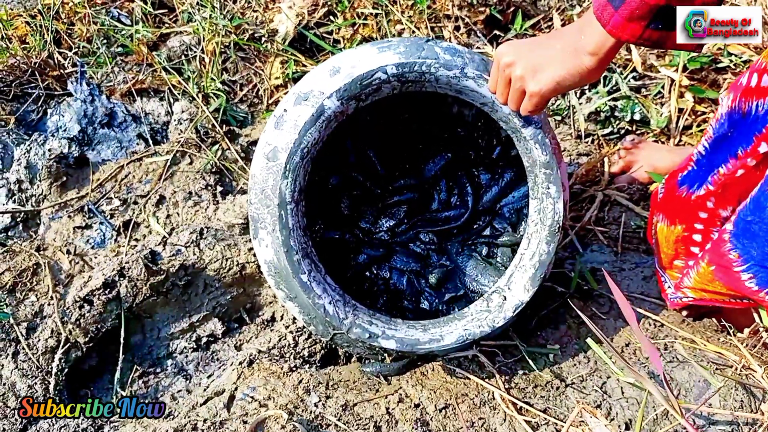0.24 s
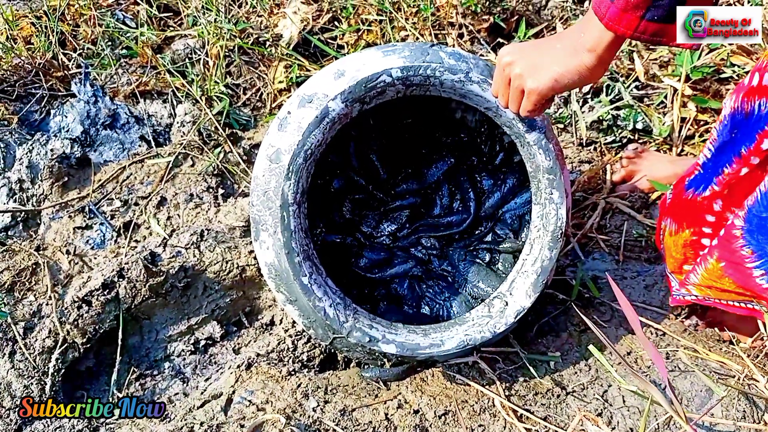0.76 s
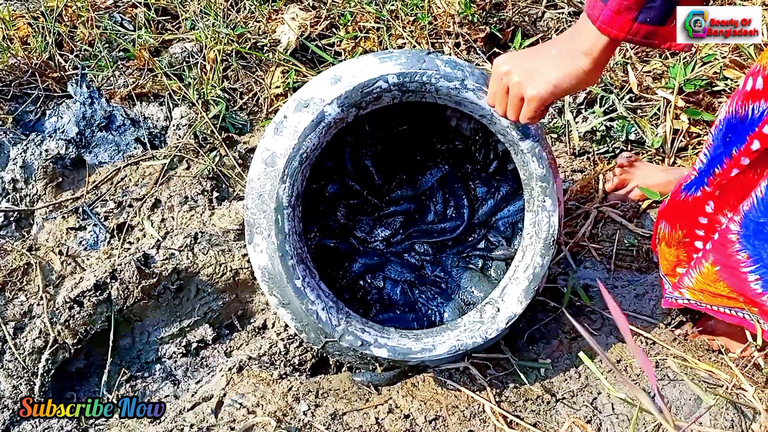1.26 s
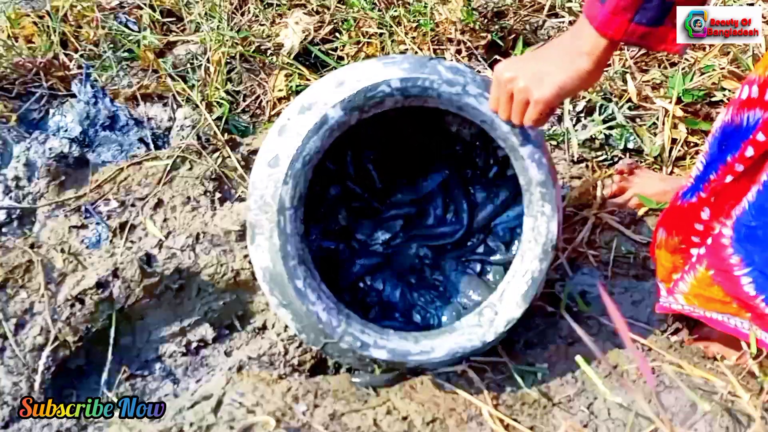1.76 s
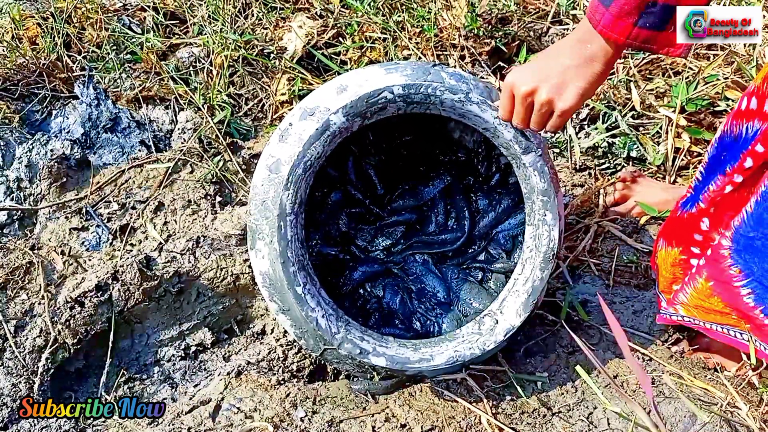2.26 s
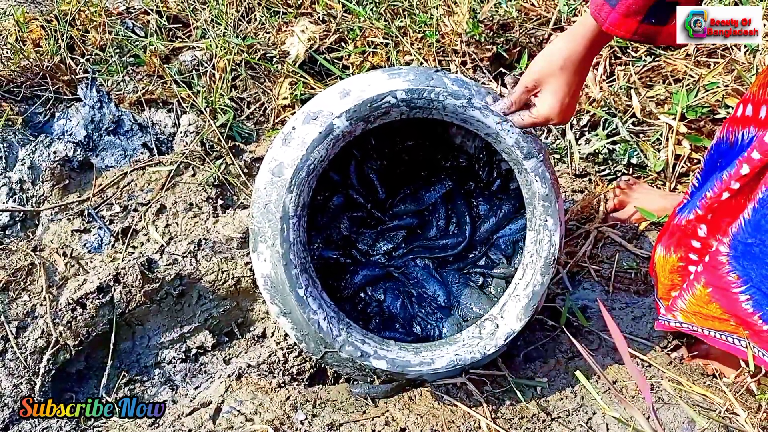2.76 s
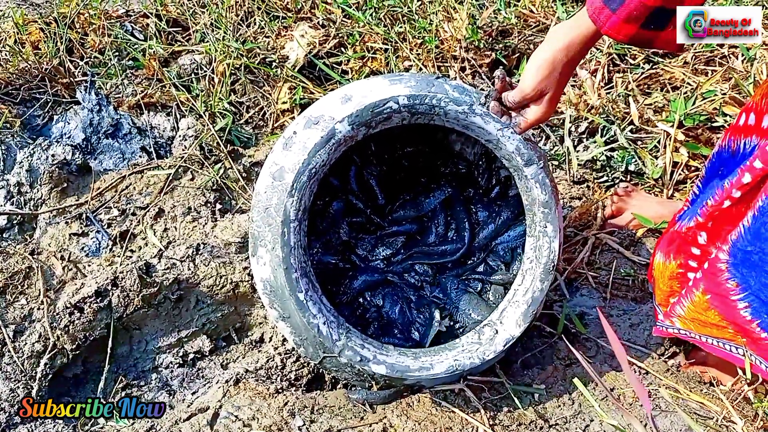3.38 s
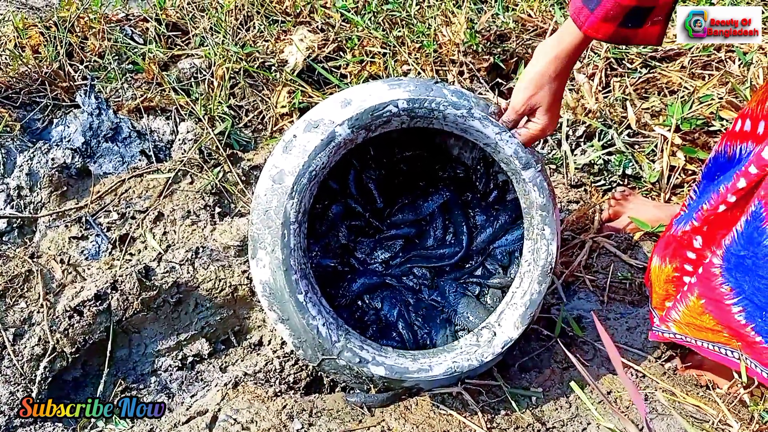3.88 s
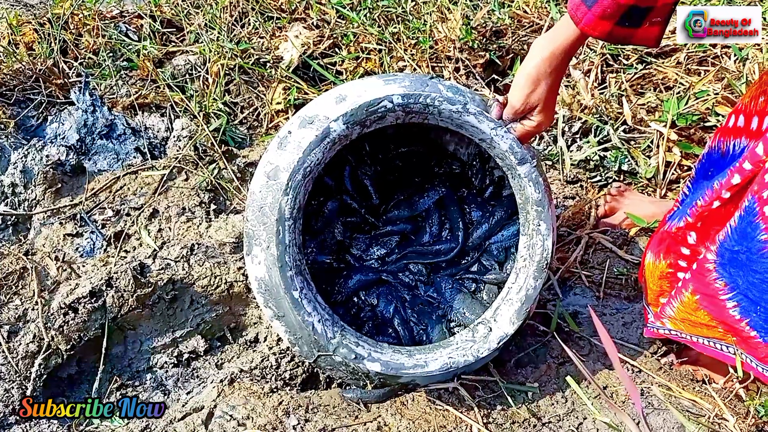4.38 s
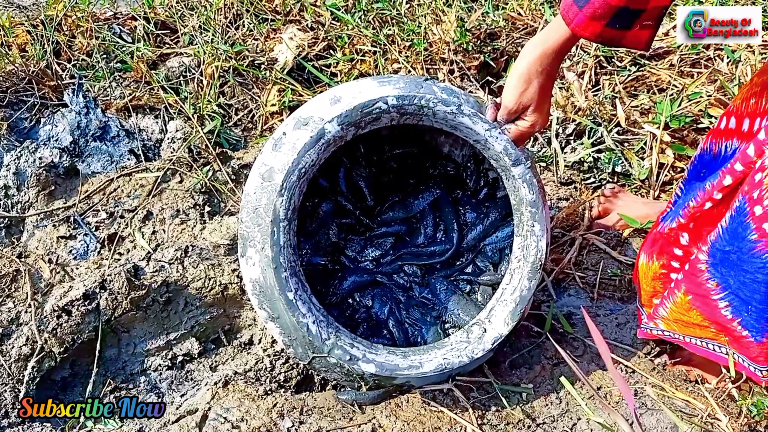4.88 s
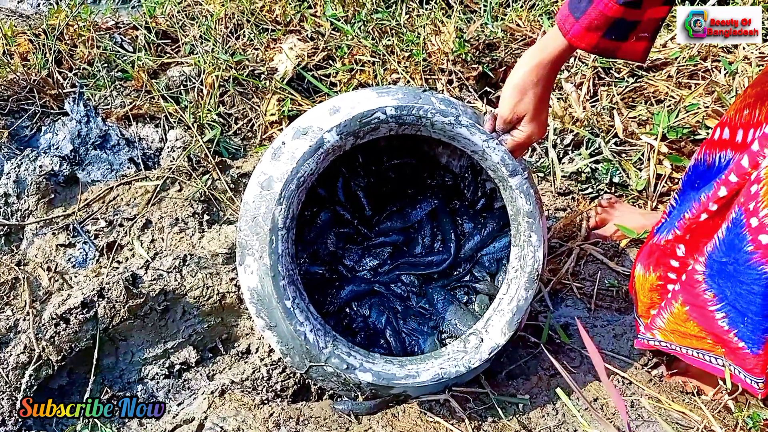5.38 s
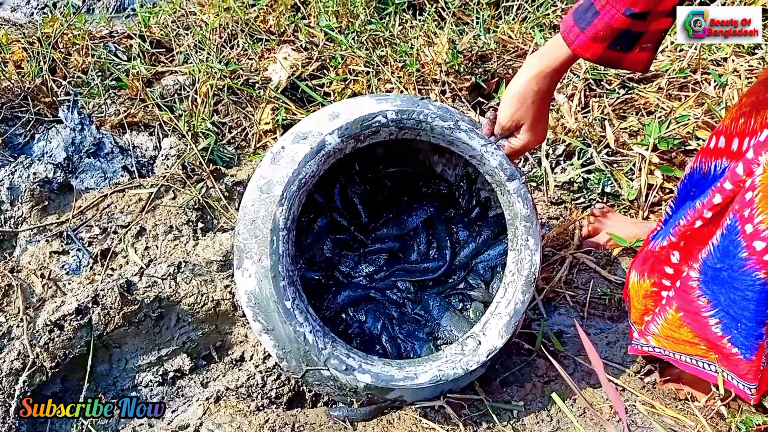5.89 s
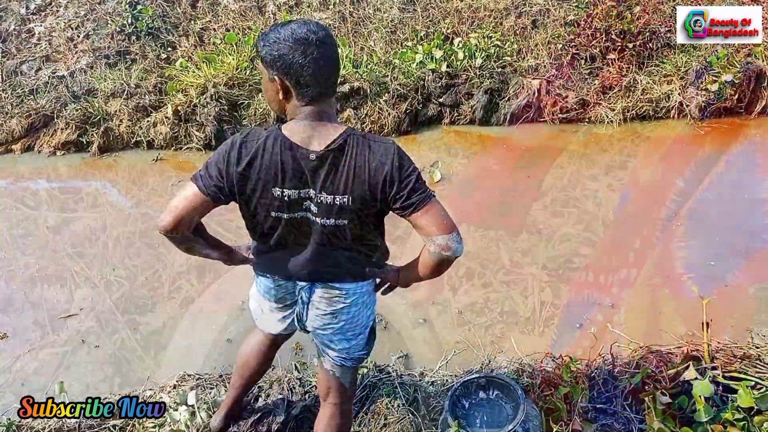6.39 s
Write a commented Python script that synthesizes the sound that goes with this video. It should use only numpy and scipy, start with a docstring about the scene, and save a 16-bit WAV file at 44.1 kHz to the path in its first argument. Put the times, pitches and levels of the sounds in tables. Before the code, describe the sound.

A slow single-cylinder diesel pump chugs steadily outdoors, growing louder over rushing water, after early wet splashes and tiny bubble plinks nearby.

```python
"""A slow single-cylinder diesel pump chugs outdoors, nearly eleven firings a second, while water rushes on the right.
In the first second or so fish splash and bubbles plink close by: short noise bursts and brief sine tones.
The speed creeps up twice, and each time the governor cuts the fuel (1.6 s, 4.2 s): the beat drops, then recovers.
Each cycle is an exhaust thump and a hollow intake knock, made of filtered pulses over gas noise and gear whine.
Runs of hissing chuffs come at about 3 s and after 5 s; the sound grows overall, then fades with faint sagging tones."""
import sys
import numpy as np
from scipy import signal
from scipy.fft import rfft, irfft, next_fast_len
from scipy.io import wavfile
from scipy.ndimage import uniform_filter1d, map_coordinates

SR = 44100
rng = np.random.default_rng(int(sys.argv[2]) if len(sys.argv) > 2 else 0)


def digitize_waveform(pressure):
    """Quantize a signal to 16-bit integers and store it at the path in sys.argv[1].

    Rows of a 2-D input are taken as channels; values are limited to [-1, 1].
    """
    field = np.atleast_2d(pressure).T
    bounded = np.clip(field, -1, 1)
    quanta = np.round(bounded * 32767).astype(np.int16)
    wavfile.write(sys.argv[1], SR, quanta)


N = 292956
TIME = np.arange(N) / SR  # seconds

# Engine speed. Each row: time in seconds, firings per second.
ENGINE_SPEED = [(0, 10.591), (1.484, 11.18), (1.815, 10.474), (2.164, 10.329), (3.682, 10.771),
                (4.182, 11.056), (4.547, 10.61), (5.735, 10.512), (6.64, 10.935)]
# Colour of the low gas noise and of the scattered echo. Each row: frequency in Hz, relative level in dB.
RUMBLE_COLOUR = [(25, -38), (42, -26), (65, -4), (110, -2.5), (170, 4), (240, 5.5), (330, 2), (450, -21),
                 (700, -12.5), (1000, -79)]
KNOCK_CUT_SHARE = 0.64  # part of the thump's drop in dB that the knock and the gulp share


def amp(db):
    """Turn decibels into a gain."""
    return 10 ** (np.asarray(db) / 20)


def unit(x):
    """Scale to an rms (average strength) of 1."""
    return x / np.sqrt(np.mean(x ** 2) + 1e-20)


def along(points, hz):
    """Read a curve of (Hz, value) points, joined by straight lines on a log frequency axis."""
    f, v = np.transpose(points)
    return np.interp(np.log(hz + 1), np.log(f + 1), v)


def curves(rows, when=TIME):
    """Read each column after the time at the given moments."""
    s, *cols = np.transpose(rows)
    return [np.interp(when, s, c) for c in cols]


def wobble(rate):
    """A smooth random curve of rms 1 through `rate` random points a second."""
    knots = rng.standard_normal(int(N * rate / SR) + 4)
    return unit(map_coordinates(knots, [TIME * rate]))


def filtered(x, response):
    """Multiply the spectrum of x by a response, which is a function of frequency."""
    m = next_fast_len(N + SR // 2)
    return irfft(rfft(x, m) * response(np.fft.rfftfreq(m, 1 / SR)), m)[..., :N]


def delay(hz, s):
    """Response of a pure delay of s seconds."""
    return np.exp(-2j * np.pi * hz * s)


def resonance(hz, centre, width):
    """Response of one damped resonance; a wider one dies sooner."""
    return 1j * hz * width / (centre ** 2 - hz ** 2 + 1j * hz * width)


def placed(x, lead_s, right_db):
    """Place a sound in stereo: the left side hears it lead_s earlier, the right side right_db louder."""
    def sides(hz):
        left = delay(hz, -lead_s / 2) * amp(-right_db / 2)
        right = delay(hz, lead_s / 2) * amp(right_db / 2)
        return np.array([left, right])
    return filtered(x, sides)


def rush(spectrum, grain_db, rings=()):
    """Stereo noise of rms 1, broken into millisecond grains and coloured by a spectrum and resonances."""
    # Each row: frequency in Hz, likeness of left and right (1 means the same).
    likeness = [(200, 0.98), (500, 0.89), (1000, 0.4), (2000, 0.41), (4000, 0.71), (8000, 0.079)]
    pair = rng.standard_normal((2, N)) * amp(grain_db * wobble(900))

    def colour(hz):
        boost_db = sum(db * np.abs(resonance(hz, centre, width)) ** 2 for centre, width, db in rings)
        return amp(along(spectrum, hz) + boost_db)

    def mix(hz):
        # the angle shares the noise out between the middle and the sides
        turn = np.arccos(np.clip(along(likeness, hz), -1, 1)) / 2
        return colour(hz) * [np.cos(turn), np.sin(turn)]

    mid, side = filtered(pair, mix)
    return unit(np.array([mid + side, mid - side]))


def patchy(x, depth_db, size=256):
    """From moment to moment noise favours other pitches; a longer window gives narrower, slower patches."""
    z = signal.stft(x, nperseg=size)[2]
    patches = uniform_filter1d(rng.standard_normal(z.shape[1:]), size=2, axis=0)
    patches = uniform_filter1d(patches, size=4, axis=1)
    return unit(signal.istft(z * amp(depth_db * unit(patches)), nperseg=size)[1][:, :N])


def ringing(x, centre_hz, width_hz, share):
    """Add the ring of one cavity that x excites."""
    return x + share * signal.lfilter(*signal.iirpeak(centre_hz, centre_hz / width_hz, SR), x)


def pulses(times, db, response, ring_s=1):
    """One pressure pulse of the given peak level at each time, coloured by a response, damped after ring_s."""
    train = np.bincount(np.round(times * SR).astype(int), amp(db), N)[:N]
    shape = irfft(response(np.fft.rfftfreq(SR, 1 / SR)))
    shape = shape / (1 + (np.fft.fftfreq(SR) / ring_s) ** 4)  # here fftfreq gives seconds from the pulse
    return signal.fftconvolve(train, np.fft.fftshift(shape))[SR // 2:][:N] / np.abs(shape).max()


def crank():
    """Add up the speed into cycles: gives firing times, and at each sample the seconds since a firing."""
    rate, = curves(ENGINE_SPEED)
    cycles = np.cumsum(rate) / SR - rate[0] * .0522  # the first firing comes at 0.0522 s
    fired = np.interp(np.arange(int(cycles[-1]) + 1), cycles, TIME)
    return fired, cycles % 1 / rate


def fuel_cut_db(when):
    """How far the governor holds the beat down: a sudden cut and a gradual return."""
    # Each row: moment of the cut in seconds, drop of the thump in dB.
    cuts = [(1.584, 7.5), (4.22, 3.5)]
    recover_s = 0.15
    return sum(db * (when >= s) * np.exp(-np.abs(when - s) / recover_s) for s, db in cuts)


def thump_db(when):
    """Strength of the beat at the given moments: its slow course less the fuel cuts."""
    # Each row: time in seconds, beat level in dB before the fuel cuts and the exhaust's own gain.
    loudness = [(0, -26), (.8, -22.5), (2.3, -24.5), (2.8, -19.5), (3.9, -14), (5.1, -11), (5.9, -9),
                (6.38, -11.5), (6.64, -22)]
    return curves(loudness, when)[0] - fuel_cut_db(when)


def following(law):
    """Level in dB of a layer that grows with the beat's strength and with speed."""
    usual_thump_db, usual_rate = -20, 10.6  # rate in firings per second
    usual_db, per_db, per_rate = law
    stronger_db = thump_db(TIME) - usual_thump_db
    faster = curves(ENGINE_SPEED)[0] - usual_rate
    return usual_db + per_db * stronger_db + per_rate * faster


def tones():
    """Faint sine tones near the end swell, sag in pitch and fade."""
    # Each row: middle in seconds, half length in seconds, pitch in Hz, glide in Hz per second, level in dB.
    sags = [(6.188, 0.17, 857, -120, -40.5), (6.219, 0.087, 655, -200, -38), (6.54, 0.045, 990, -200, -45)]
    glides = np.zeros(N)
    for s, half_s, hz, glide, db in sags:
        swell = np.exp(-((TIME - s) / half_s) ** 2)
        phase = 2 * np.pi * np.cumsum(hz + glide * (TIME - s)) / SR
        glides += amp(db) * swell * np.sin(phase)
    return placed(glides, lead_s=.0002, right_db=1)


def gears(age, swing=0.33):
    """A gear of 53 teeth turns once per cycle; firings kick it, and its whine wavers in uneven spurts."""
    # Each row: time in seconds, whine level in dB.
    whine_level = [(0, -56), (.5, -50.5), (1.4, -47), (1.9, -53), (3, -49.5), (5.2, -43), (5.9, -36),
                   (6.2, -40), (6.64, -49)]
    rate, = curves(ENGINE_SPEED)
    mesh = 2 * np.pi * 53 * np.cumsum(rate) / SR
    kick = np.sin(2 * np.pi * age * rate)
    load_db = 1.5 * kick + 8 * np.tanh(wobble(19))
    waver = 1.1 * wobble(14) + .35 * wobble(60)  # radians
    tooth_tone = np.sin(mesh + swing * kick + waver)
    whine = amp(curves(whine_level)[0]) * unit(amp(load_db) * tooth_tone)
    return placed(whine, lead_s=.0002, right_db=1)


def water(age, throb_db=0.78, flutter_db=1.0):
    """The pumped water gurgles, rushes in fine spatter and throbs a little with the strokes."""
    # Colours of the spatter and the gurgle. Each row: frequency in Hz, relative level in dB.
    spatter_colour = [(600, -59), (930, -30.5), (1150, -14), (1400, -17), (1800, -9), (2300, -8),
                      (3100, -1), (3800, -10.5), (4700, -13), (5400, -17), (6200, -15.5), (7000, -17),
                      (8600, -40.5), (13000, -55), (15500, -48.5)]
    gurgle_colour = [(450, -27.5), (700, -2), (830, 3), (960, -2.5), (1150, -1), (1450, -7), (2000, -3),
                     (4500, -23.5), (7000, -43), (9000, -63)]
    # Ringing of the outlet pipe. Each row: pitch in Hz, width in Hz, boost in dB.
    outlet_rings = [(2360, 510, 6), (3065, 107, 3), (6595, 220, 6)]
    # Courses of the two levels. Each row: time in seconds, level in dB before the offset added below.
    spatter_course = [(0.0, -42.5), (0.63, -41), (0.85, -37.5), (1.5, -40.5), (3.33, -36), (4.22, -31),
                      (5.75, -28.5), (6.64, -49.5)]
    gurgle_course = [(0.0, -67.5), (3.14, -51.5), (5.66, -37), (6.25, -40), (6.64, -52)]
    gurgle_db = 4.5 + curves(gurgle_course)[0]
    spatter_db = -1.5 + curves(spatter_course)[0]
    throb = np.cos(2 * np.pi * (age - .018) * curves(ENGINE_SPEED)[0])  # strongest 18 ms after a firing

    gurgle = patchy(rush(gurgle_colour, grain_db=2.0), depth_db=3.5)
    gurgle = amp(gurgle_db + 1.47 * throb) * gurgle

    # slow, narrow patches first, then quick, broad ones
    stream = patchy(rush(spatter_colour, grain_db=0.5, rings=outlet_rings), depth_db=2.2, size=2048)
    flicker_db = throb_db * throb + flutter_db * wobble(45)
    spatter = amp(spatter_db + flicker_db) * patchy(stream, depth_db=2.5)
    return placed(gurgle, lead_s=0.00035, right_db=5.5) + placed(spatter, lead_s=0.000435, right_db=12.0)


def chuffs(spit_db=-8):
    """Bursts of hiss, in runs a little slower than the firing, swell to a sharp spit with a hoarse ring."""
    # Each row: middle in seconds, level in dB, half length in seconds, ring in Hz, strength of the ring.
    puffs = [(2.678, -38, 0.0065, 2420, 2.2), (2.777, -41.5, 0.0021, 2080, 1.1),
             (2.87, -43, 0.0039, 5840, 0.57), (2.973, -40.5, 0.0056, 2330, .8),
             (3.062, -40.5, 0.0055, 3100, 1.4), (3.264, -39, 0.0044, 5600, 0.76),
             (5.04, -28, 0.011, 6700, 0.4), (5.396, -33, 0.0049, 6600, 0.63),
             (5.493, -29.5, 0.0037, 6650, 0.67), (5.59, -32, 0.0033, 7000, 0.57),
             (5.686, -23.5, 0.0045, 6600, 0.33), (5.786, -24, 0.0058, 3060, 1.2),
             (5.881, -23.5, 0.0065, 4440, 0.32), (5.979, -24.5, 0.008, 3790, 0.67),
             (6.071, -28.5, 0.013, 3500, 0.68), (6.169, -25.5, 0.0079, 2530, 0.77),
             (6.264, -29, 0.0067, 2455, 1.8), (6.361, -35, 0.011, 6760, 0.81),
             (6.455, -34.5, 0.014, 2750, 0.48), (6.549, -41.5, 0.01, 3460, 1.7)]
    # Each row: frequency in Hz, relative level in dB.
    hiss_colour = [(600, -28), (1700, -10), (2600, 3.5), (3700, -7), (5000, -10.5), (5900, -13),
                   (6900, -11), (7800, -24), (9000, -52), (15000, -48)]
    hiss = patchy(rush(hiss_colour, grain_db=1.5), depth_db=4)
    hoarse = 1.2 * wobble(700)  # radians of random phase
    bursts = np.zeros((2, N))
    for s, db, half_s, hz, share in puffs:
        near = np.abs(TIME - s) < .05
        t = TIME[near] - s
        ring = np.sin(2 * np.pi * hz * TIME[near] + hoarse[near])
        spit = np.exp(-(t / .0018) ** 2)
        swell = np.exp(-np.abs(t) / half_s)
        bursts[:, near] += amp(db) * (swell + amp(spit_db) * spit) * (hiss[:, near] + share * ring)
    return placed(bursts, lead_s=0.000445, right_db=11.0)


def droplets(per_s=1100, centre_hz=2900, spread=0.527, cycles=3.5, count=300):
    """A dense patter of drops, each a few cycles of its own pitch and size, `count` samples long."""
    drops = rng.random((int(per_s * N / SR), 4))  # time, two draws for the pitch, size
    hz = centre_hz * np.exp(2 * spread * (drops[:, 1:2] + drops[:, 2:3] - 1))
    hz = np.minimum(hz, 7000)
    turns = hz * np.arange(count) / SR
    size = .2 + drops[:, 3:] ** 3  # mostly small drops
    pings = size * np.sin(2 * np.pi * turns) * (1 - np.exp(-2 * turns)) * np.exp(-turns / cycles)
    places = (drops[:, :1] * N).astype(int) + np.arange(count)
    return unit(np.bincount(places.ravel(), pings.ravel(), N)[:N])


def fish(rise_s=0.003, drops_db=0):
    """Fish in a pot slap shallow water into spray and a patter of drops, each over a ringing air pocket."""
    # Each row: start in seconds, level in dB before the trim below, ring in Hz, decay in seconds.
    slaps = [(0.079, -24.5, 2740, 0.0098), (0.14, -29.5, 2320, 0.0095), (.222, -33.5, 3130, 0.011),
             (0.41, -34, 5050, 0.015), (0.735, -28.5, 1450, 0.01), (.778, -30.5, 1400, 0.0067),
             (0.792, -30, 5000, 0.009), (0.814, -30.5, 5600, 0.011), (0.827, -32, 1400, 0.01),
             (0.86, -26, 3700, 0.0068), (0.874, -33, 4400, .009), (0.887, -27, 3020, 0.006),
             (0.894, -22, 5000, 0.0052), (0.903, -21, 2720, 0.0075), (1.164, -18, 3230, 0.0069),
             (1.172, -24.5, 1800, 0.0096)]
    # Each row: frequency in Hz, relative level in dB.
    spray_colour = [(300, -13), (700, -9), (1100, -7.5), (1900, -3), (3000, -4), (4500, -10), (7000, -5),
                    (8500, -26), (12000, -35), (15000, -33.5)]
    spray = patchy(rush(spray_colour, grain_db=2.5), depth_db=3)
    spray = unit(spray + amp(drops_db) * droplets())
    pot = np.zeros((2, N))
    for s, db, hz, decay in slaps:
        since = np.maximum(TIME - s, 0)
        slap = amp(db - 5.5) * (1 - np.exp(-since / rise_s)) * np.exp(-since / decay)
        pot += ringing(slap * spray, hz, width_hz=500, share=1.8)
    return placed(pot, lead_s=0, right_db=-2.5)


def bubbles(rise_s=0.00044, glide_per_s=4):
    """Air pockets ring briefly and roughly in churned water; their pitch rises as they near the surface."""
    # Each row: start in seconds, level in dB before rise and decay, pitch at the start in Hz, decay in seconds.
    pockets = [(.7238, -26.5, 1800, 0.0064), (.7716, -29, 3040, .008), (.829, -33, 1230, .003),
               (.8514, -29, 2400, 0.0044), (.8595, -22, 3770, .003), (.909, -23, 2320, 0.0047),
               (2.875, -27, 4000, 0.0043)]
    plinks = np.zeros(N)
    t = TIME[:SR // 16]
    churn = .8 * wobble(900)  # radians of random phase
    for s, db, hz, decay in pockets:
        start = round(s * SR)
        phase = 2 * np.pi * hz * t * (1 + glide_per_s * t / 2)
        tone = np.sin(phase + churn[start:][:len(t)])
        plinks[start:][:len(t)] += amp(db) * (1 - np.exp(-t / rise_s)) * np.exp(-t / decay) * tone
    return placed(plinks, lead_s=0, right_db=6.0)


def gas(age):
    """Turbulent gas rumbles and rasps after each firing and dies down before the next."""
    # How each noise follows the engine: level in dB at a usual beat, dB per dB of thump,
    # dB per extra firing a second. The rumble grows more slowly than the thump.
    rumble_law = (-40.3, .62, 2)
    rasp_law = (-40, 1.1, 7.2)
    # Each row: frequency in Hz, relative level in dB.
    rasp_colour = [(200, 0.5), (310, 1), (410, 4.5), (500, -2), (620, -3.5), (730, -7), (860, -30.5),
                   (1200, -19), (2000, -42), (6000, -89)]

    def puff(rise_s, fall_s, rest):
        return unit(rest + (1 - np.exp(-age / rise_s)) * np.exp(-age / fall_s))

    rumble_puff = puff(rise_s=.003, fall_s=0.04, rest=.1)
    rumble = amp(following(rumble_law)) * rumble_puff * rush(RUMBLE_COLOUR, grain_db=2)
    rasp_puff = puff(rise_s=0.001, fall_s=0.04, rest=0.25)
    rasp = amp(following(rasp_law)) * rasp_puff * rush(rasp_colour, grain_db=1.5)
    return placed(rumble + rasp, lead_s=0.00015, right_db=0.0)


def gulp(fired, centre_hz=70, width_hz=32, lag_s=0.0317):
    """The falling piston draws in air with one deep, rounded dip of pressure, lag_s after the firing."""
    # Each row: time in seconds, peak level in dB before the fuel cuts.
    gulp_level = [(0, -40), (1.2, -36), (2, -39.5), (2.8, -27.5), (3.9, -26), (5.8, -35), (6.4, -27),
                  (6.64, -44)]
    level = curves(gulp_level, fired)[0] - KNOCK_CUT_SHARE * fuel_cut_db(fired)
    return -pulses(fired + lag_s, level, lambda hz: np.exp(-((hz - centre_hz) / width_hz) ** 2))


def silencer(fired, hum_hz=168, width_hz=3.6):
    """Each firing sets the silencer humming on between the strokes."""
    # Each row: time in seconds, peak level of one ring in dB before the fuel cuts.
    hum_level = [(0, -44), (1.6, -47.5), (2.2, -31), (3.2, -30.5), (4.6, -26), (5.5, -30.5), (6.1, -33.5),
                 (6.64, -36)]
    level = curves(hum_level, fired)[0] - fuel_cut_db(fired)
    return pulses(fired, level, lambda hz: resonance(hz, hum_hz, width_hz) / (1 + 1j * hz / hum_hz / 2))


def intake(fired, soft_hz=400, scatter_db=1.8):
    """About half a crank turn after the firing the intake gives one rounded, hollow knock."""
    # Each row: time in seconds, delay of the knock after the thump in cycles.
    knock_lag = [(0, .245), (5.3, .254), (6.3, .281)]
    # Each row: time in seconds, peak level in dB before the fuel cuts and random scatter.
    knock_level = [(0, -23.5), (1.3, -17), (2.3, -22.5), (4.3, -18.5), (5.2, -16), (6.3, -25), (6.64, -52)]
    when = fired + curves(knock_lag, fired)[0] / curves(ENGINE_SPEED, fired)[0]
    level = curves(knock_level, fired)[0] - KNOCK_CUT_SHARE * fuel_cut_db(fired)
    level = level + scatter_db * rng.standard_normal(len(fired))
    return pulses(when, level, lambda hz: resonance(hz, centre=168, width=164) * np.exp(-(hz / soft_hz) ** 2))


def exhaust(fired, muffle_hz=300, bright_hz=850, open_end_hz=25, valve_hz=950, gain_db=-3.0, edge_scatter=0.2):
    """Each burst of gas rings the pipe; loud ones have a sharper edge and die sooner, and no two are alike."""
    # Resonances of the exhaust pipe. Each row: pitch in Hz, width in Hz, level in dB.
    pipe_rings = [(157, 23.8, -1), (292, 100, -12), (406, 770, -29)]

    def pipe(hz):
        rings = sum(amp(db) * resonance(hz, centre, width) for centre, width, db in pipe_rings)
        suction = amp(-12.5) * resonance(hz, centre=74, width=120)  # slow suction behind each slug of gas
        return rings - suction

    def outlet(top_hz):
        def response(hz):
            open_end = 1j * hz / (1j * hz + open_end_hz)  # an open end radiates no steady pressure
            valve = np.exp(-(hz / valve_hz) ** 2)  # the valve opens gradually and rounds the front
            return pipe(hz) * open_end / (1 + 1j * hz / top_hz) ** 2 * valve
        return response

    level = gain_db + thump_db(fired) + .5 * rng.standard_normal(len(fired))
    edge = np.interp(level, [-26, -13], [0, 1])  # 0 is soft, 1 is sharp
    sharp = np.clip(edge + edge_scatter * rng.standard_normal(len(fired)), 0, 1)
    sharp = np.interp(TIME, fired, sharp)
    soft_thump = pulses(fired, level, outlet(muffle_hz), ring_s=.02)
    hard_thump = pulses(fired, level, outlet(bright_hz), ring_s=.0125)
    return (1 - sharp) * soft_thump + sharp * hard_thump


def field(x, scatter_db=-23):
    """Each beat is reflected twice, and rough ground scatters it into a short tail."""
    # Each row: delay in seconds, gain (negative where an open pipe end turns the wave over).
    reflections = [(0.024, -0.27), (.032, 0.043)]
    t = TIME[:SR // 4]
    noise = filtered(rng.standard_normal(N), lambda hz: amp(along(RUMBLE_COLOUR, hz)))[:len(t)]
    tail = noise * amp(-60 * t / .16) * (1 - np.exp(-t / .02))  # decays by 60 dB in 0.16 s
    tail /= np.sqrt(np.mean(np.abs(rfft(tail, SR)[100:400]) ** 2))  # average gain of 1 from 100 to 400 Hz
    echoes = filtered(x, lambda hz: sum(gain * delay(hz, s) for s, gain in reflections))
    return x + echoes + amp(scatter_db) * signal.fftconvolve(x, tail)[:N]


def scene():
    """The engine, its water and the pot of fish."""
    fired, age = crank()
    reflected = field(exhaust(fired) + silencer(fired) + intake(fired))
    beats = placed(reflected + gulp(fired), lead_s=0.00031, right_db=-0.5)
    return beats + gas(age) + gears(age) + tones() + water(age) + chuffs() + fish() + bubbles()


def record(dry, low_cut_hz=52, top_hz=15600):
    """The microphone side weakens the deepest bass and keeps nothing from top_hz up."""
    def response(hz):
        low_cut = hz ** 3 / np.sqrt(hz ** 6 + low_cut_hz ** 6)
        return (hz < top_hz) * low_cut
    return filtered(dry, response)


dry = scene()
out = record(dry)
digitize_waveform(out)
```